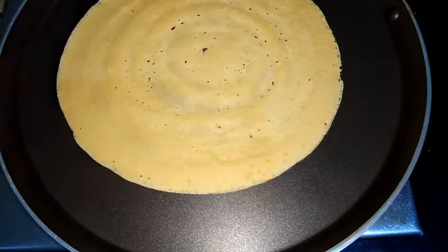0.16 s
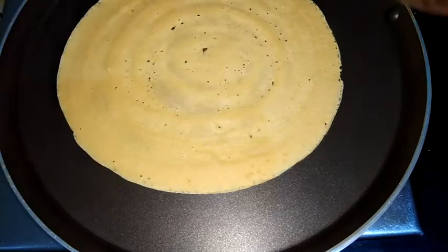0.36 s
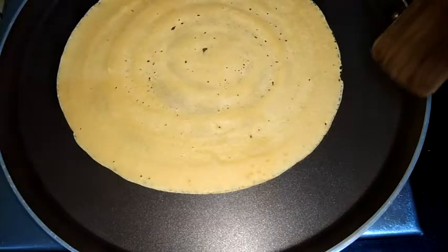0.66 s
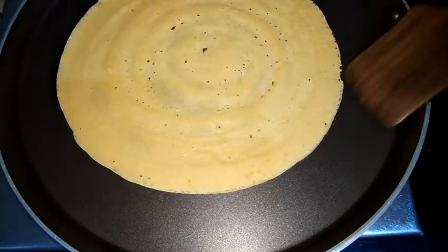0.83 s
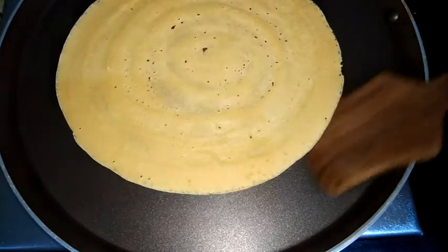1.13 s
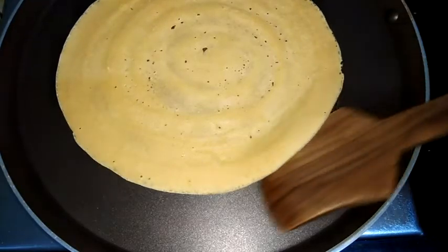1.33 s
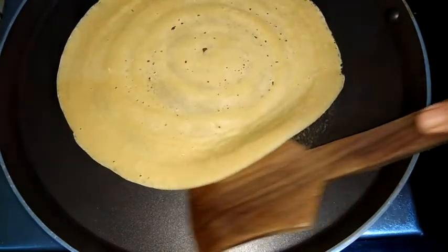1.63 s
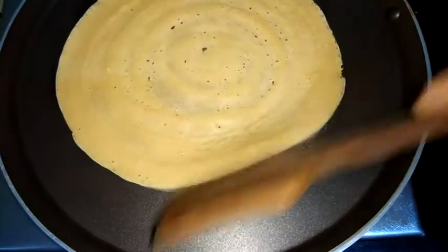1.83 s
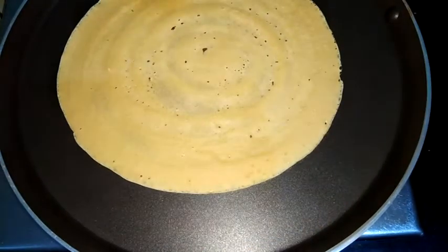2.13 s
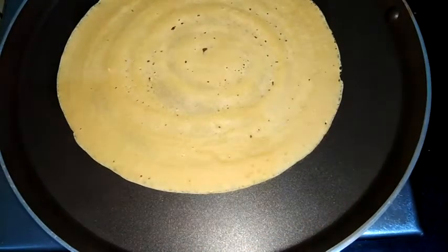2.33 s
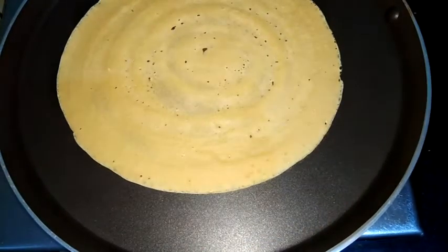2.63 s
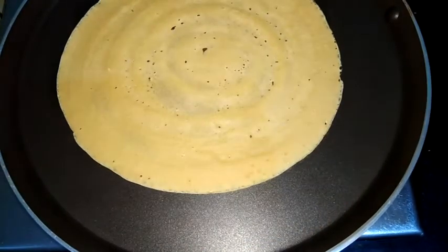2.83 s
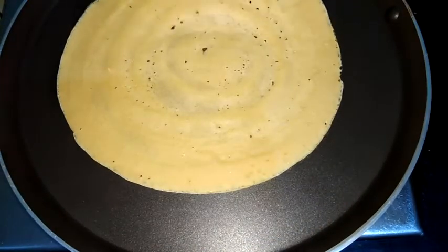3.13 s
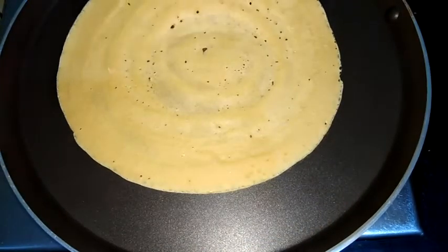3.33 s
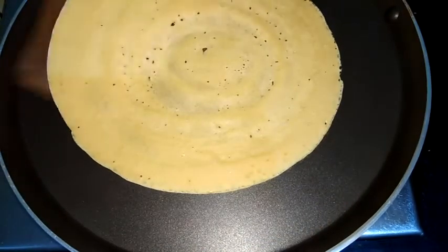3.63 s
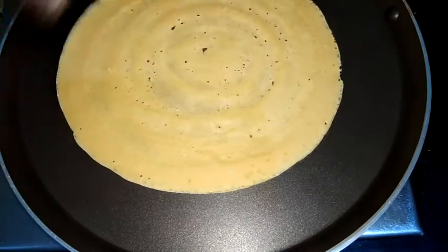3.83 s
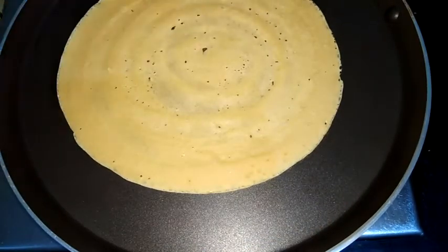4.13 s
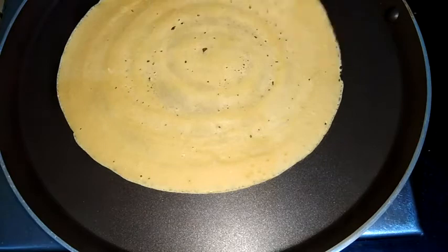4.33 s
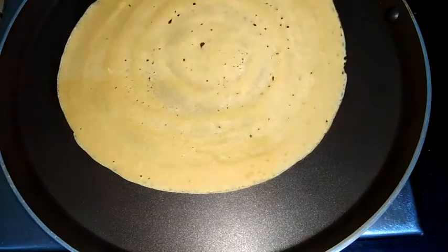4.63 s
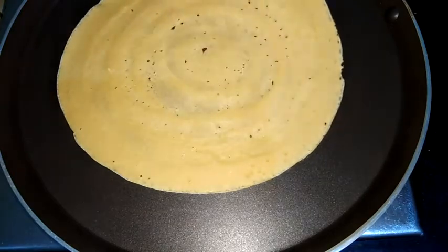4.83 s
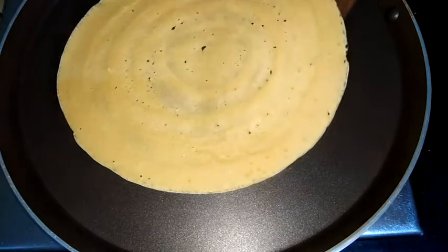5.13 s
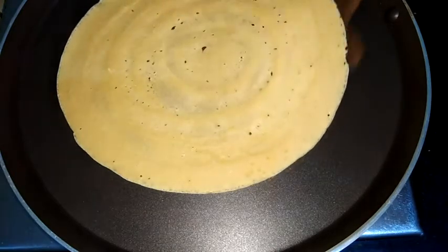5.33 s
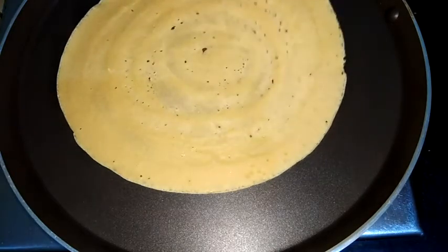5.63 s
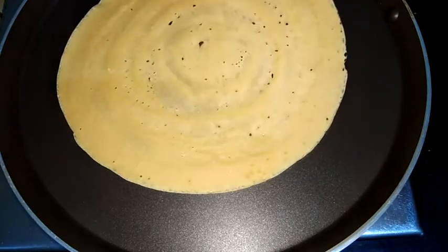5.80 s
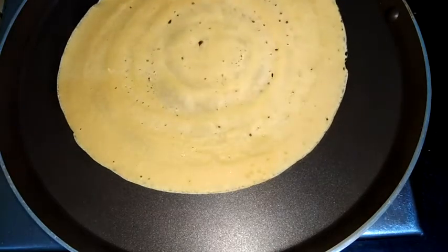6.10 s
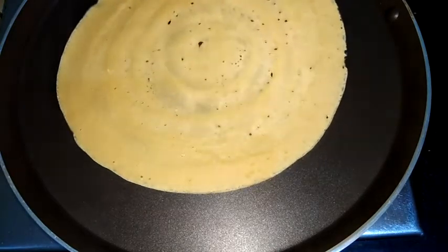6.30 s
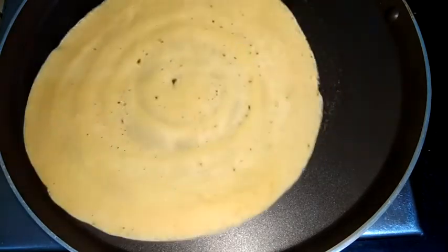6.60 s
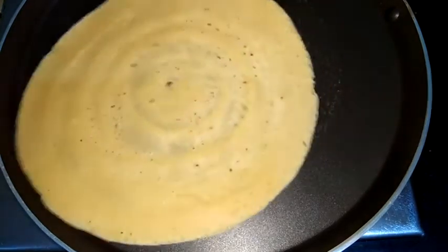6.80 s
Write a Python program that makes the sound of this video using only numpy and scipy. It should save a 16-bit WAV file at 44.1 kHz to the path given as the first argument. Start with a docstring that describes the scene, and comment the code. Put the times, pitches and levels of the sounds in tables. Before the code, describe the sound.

Wood scrapes round a thin crisp bread in a metal pan, with knocks, crust snaps and busy rasping strokes over a faint pulsing cricket.

```python
"""A wooden spatula brushes the rim of a nonstick pan, lands with a boom and glides round a thin, crisp flatbread.
Batter fizzes faintly at first; the crust snaps as it lifts, then the blade skitters over the rim and knocks the pan.
Rasping strokes follow to the end: tiny random slips drive hiss, rasp and the pan's ringing modes.
Throughout, a pulsing narrow noise band gives a faint cricket over a soft kitchen rush.
The left microphone faces the pan, the right one is shaded."""
import sys
import numpy as np
from scipy import signal
from scipy.fft import rfft, irfft, next_fast_len
from scipy.io import wavfile
from scipy.ndimage import uniform_filter1d, map_coordinates

SR = 44100
rng = np.random.default_rng(int(sys.argv[2]) if len(sys.argv) > 2 else 0)


def to_wav(sig):
    """Store sig (one row per channel, or 1-D mono) as 16-bit WAV at the path in sys.argv[1].

    Samples outside -1..1 are clipped; the rate is SR.
    """
    pcm = np.clip(np.atleast_2d(sig), -1, 1) * 32767
    pcm = np.round(pcm).astype(np.int16)
    wavfile.write(sys.argv[1], SR, pcm.T)  # frames by channels


N = 306936

# All levels in the tables are before the mix trims of the layers.
# Pushes and pulls of the blade. Each row: start, fastest moment and end in seconds, rasp in dB,
# hiss and ring in dB relative to the rasp, contact pitch in Hz, its fall in Hz per second.
STROKES = [(1.997, 2.067, 2.17, -54, 2.5, -31, 700, 0), (2.08, 2.12, 2.38, -87, 16, 10, 720, 0),
           (2.606, 2.844, 2.98, -62.5, -11.5, 12.5, 980, 202),
           (2.827, 3.104, 3.22, -50, -3, 11.5, 896, 905), (3.206, 3.314, 3.34, -60.5, -1, 12, 845, 500),
           (3.371, 3.468, 3.58, -49.5, -3.5, 14, 875, 500), (3.45, 3.655, 3.75, -48, -0.5, 7.5, 917, 0),
           (3.767, 3.825, 3.89, -62, 0.5, 7, 916, 0), (4.153, 4.219, 4.34, -44.5, -4.5, 6, 980, 0),
           (4.257, 4.408, 4.57, -44.5, -3, 9, 952, 1002), (4.592, 4.725, 4.85, -47.5, -3, 8.5, 840, 300.5),
           (4.851, 5.02, 5.19, -44.5, -2.5, 9.5, 864, 998), (5.158, 5.411, 5.54, -44, -2, 5, 787, -200),
           (5.525, 5.688, 5.78, -42.5, -7.5, 5, 790, -200), (5.83, 5.856, 5.96, -48, -4, 10.5, 780, 0),
           (5.997, 6.06, 6.19, -45.5, -4.5, 6, 818, -300), (6.19, 6.25, 6.39, -47, -2.5, 8.5, 820, -400),
           (6.365, 6.489, 6.58, -47, -3.5, 6, 860, 606), (6.57, 6.61, 6.7, -49, -4.5, 6, 720, 500),
           (6.732, 6.772, 6.931, -47, -6, 7.5, 730, -200)]
# The first long glide round the edge of the bread, as a curve.
# Each row: time in seconds, crust hiss in dB, wood rasp in dB, pan ring in dB.
GLIDE = [(0.699, -59, -49, -41), (0.80, -53, -56, -46.5), (0.92, -51.5, -47.5, -46),
         (1.05, -52.5, -52, -44.5), (1.29, -54, -54.5, -43), (1.47, -56, -57, -50.5),
         (1.71, -54.5, -57, -55.5), (1.87, -60.5, -63.5, -67), (1.98, -67, -65.5, -64.5)]
# Bare wood dragging on metal. Each row: start in seconds, hold in seconds, boom in dB, fade in dB per second.
DRAGS = [(0.697, 0.23, -46.5, 50), (4.146, 0.02, -42.5, 140), (5.33, 0.02, -53.5, 170)]
# The blade strikes or catches on the pan. Each row: time in seconds, ring in dB,
# boom and clack in dB relative to the ring, clack pitch in Hz.
KNOCKS = [(0.698, -42, -3, 2, 2720), (1.0125, -26, -16, 2, 2450), (1.1, -29, -15, 1, 2500),
          (1.599, -26, -9, -3, 1830), (1.733, -28.5, -11, -4, 1720), (2.4565, -25, -12, -8, 2520),
          (2.465, -29, -10, -18, 1400), (2.482, -33, -12, -14, 1400), (2.498, -33, -8, -12, 1400),
          (3.436, -24, -30, -22, 1400), (4.145, -25, -7, -1, 2510), (4.242, -24, -24, -7, 2600),
          (4.695, -24.5, -34, -12, 1400), (5.342, -32, -10, -2, 2500), (5.750, -27, -24, -1, 3290),
          (5.761, -32, -27, -4, 3290), (5.827, -34, -22, -5, 2020), (6.042, -30, -26, -16, 1800),
          (6.728, -38, -23, -12, 1500)]
# The crust cracks. Each row: time in seconds, tick in dB, crumble in dB.
SNAPS = [(1.585, -22, -47), (1.814, -26, -35), (1.8378, -32, -32), (1.893, -35, -40), (2.007, -29, -35),
         (2.048, -17, -25), (2.075, -24, -33), (2.217, -29, -50), (2.2351, -22, -35), (3.82, -40, -35)]
# Dull bumps of blade and bread. Each row: time in seconds, peak in dB.
BUMPS = [(2.498, -31), (3.746, -45), (3.763, -43), (3.803, -42), (3.895, -48), (3.933, -47)]
# The bread shuffles softly on the pan. Each row: middle in seconds, half length in seconds, level in dB.
SHUFFLES = [(0.92, .09, -55), (1.235, .025, -54), (3.853, .12, -56), (6.12, 0.05, -55)]
# The blade brushes the free rim. Each row: time in seconds, scuff in dB, ring in dB.
BRUSHES = [(0.165, -60, -76), (2.15, -53, -56)]
# The lifted spatula skitters over the rim. Each row: time in seconds, peak in dB.
SKITTERS = [(2.049, -33), (2.061, -42), (2.075, -36), (2.086, -35), (2.099, -39), (2.108, -40)]

# Ringing modes. Each row: pitch in Hz, level in dB, time to fall 60 dB in seconds.
# The pan's wall, damped by the bread; the last mode is the blunt first flex.
WALL = [(400, -4, 0.14), (452, -5, 0.1), (564, -8.5, 0.06), (690, -5, 0.06), (758, 3, 0.08), (803, 0, 0.13),
        (834, 8, 0.12), (916, 5, 0.19), (996, 1, 0.17), (1075, -6, .06), (882, 0, 0.031)]
# The pan's base, same columns.
BASE = [(150.4, -15, 0.069), (203.6, -11, 0.073), (246, -8.5, 0.13), (301, 0, 0.43)]
# The free rim after a light touch, same columns.
PING = [(1295, 0, 1.1), (1435, -4, .25), (2393, -12, .2)]
# The free spatula, same columns.
SPATULA = [(620, -12, 0.06), (1277, -8, .04), (1720, -2, 0.018), (2486, 3, 0.024), (3590, 0, 0.026),
           (4370, -3, 0.018), (5000, 0, 0.016)]
# A soft push that dies at once, same columns.
PUSH = [(190, 0, .03), (360, -4, .016)]
# Short-lived resonances of blade and rim, and the hollows between them.
# Each row: centre in Hz, width in Hz, boost or cut in dB.
RIM = [(1200, 130, -5), (1340, 160, 4), (1620, 200, -7), (1830, 130, 3.5), (2470, 200, 4), (3290, 130, 7.5),
       (3750, 300, -4)]

# Noise colours. Each row: frequency in Hz, level in dB.
# Wood rasping on metal.
RASP = [(60, -24), (130, -28), (300, -12), (560, -14.5), (1100, -29.5), (1400, -2.5), (2300, -1.5),
        (2900, -8), (3800, -7), (4400, -3), (5400, -8.5), (7000, -7), (12000, -14.5)]
# Crust hiss and batter fizz, same columns.
HISS = [(2500, -20), (4800, -7), (5800, -17), (6700, -7), (8500, -4), (10700, 0), (12300, 0), (14000, -2.5),
        (15800, -3.5)]
# Cracking crust, same columns.
SNAP = [(700, -38), (2000, -15.5), (3300, -16.5), (6000, -3), (9000, -2.5), (12500, 6), (16000, -7)]
# Shuffling bread, same columns.
BUMP = [(60, -36), (130, 0.5), (220, 5.5), (400, 0), (600, -15.5), (1500, -39), (5000, -79)]
# The blade's clack and coarse grit, same columns.
CLACK = [(120, -23), (500, -1.5), (900, 4.5), (2600, -3), (3500, -11), (6000, -17.5), (12000, -39)]
# The kitchen's steady rush, same columns.
QUIET = [(25, -15), (110, 11.5), (250, 8.5), (700, 0), (2000, 0.5), (4000, -12), (15000, -5.5)]
# Likeness of the two microphones. Each row: frequency in Hz, correlation from 0 to 1.
ALIKE = [(100, 0.28), (300, 0.54), (800, 0.91), (1400, 0.033), (3100, 0.14), (6800, 0.024)]
# Shading of the right microphone. Each row: frequency in Hz, right minus left in dB.
SHADE = [(100, -5), (380, -6.5), (700, -3), (1000, -1.5), (2400, -3), (4400, -4), (6000, -7), (8100, -14),
         (11000, -23), (15000, -27)]
# The kitchen's echo. Each row: frequency in Hz, time to fall 60 dB in seconds.
KITCHEN = [(150, 0.44), (1000, 0.36), (4000, 0.29), (14000, 0.017)]

TOP_HZ = 15800  # band limit
GLIDE_HZ = 768  # contact pitch of the glide
LIFT_DB_PER_S = 154  # the glide dies away as the blade lifts
OVERRUN_S = 0.031  # each stroke is stretched by this at both ends, so close neighbours overlap
HISS_LAW, RASP_LAW, RING_LAW = 1.22, 1.99, 1.49  # each layer's amplitude grows as this power of blade speed
DETUNE = .007  # depth of the random pitch wander of the rubbed modes
STEP_S = .002  # spacing of the slow blade controls
DRAG_ATTACK_S = 0.011
BRUSH_RISE_S, BRUSH_FALL_S = 0.03, 0.049
CLACK_T60_S, THUD_T60_S = 0.018, .045


def amp(db):
    """Decibels to gain."""
    return 10 ** (np.asarray(db) / 20)


def unit(pair):
    """A stereo pair scaled so that its middle has rms 1."""
    return pair / np.sqrt(np.mean(pair.mean(0) ** 2) + 1e-20)


def along(points, hz):
    """(Hz, value) points read on a log axis."""
    f, v = np.transpose(points)
    return np.interp(np.log(hz + 1), np.log(f + 1), v)


def wobble(rate):
    """A smooth random curve, rate knots a second."""
    knots = rng.standard_normal(int(N * rate / SR) + 4)
    return map_coordinates(knots, [np.arange(N) * rate / SR])


def to_samples(control):
    """A slow control, one value a step, drawn out to one value a sample."""
    return np.interp(np.arange(N) / SR, np.arange(len(control)) * STEP_S, control)


def filtered(x, response):
    """x times a response of frequency."""
    m = next_fast_len(N + SR // 2)
    return irfft(rfft(x, m) * response(np.fft.rfftfreq(m, 1 / SR)), m)[..., :N]


def resonance(f, hz, width):
    """Causal response of one mode."""
    return 1j * f * width / (hz * hz - f * f + 1j * f * width)


def blade_colour(f, spectrum):
    """Broad response of wood on metal with the rim's resonances on top."""
    peaks = np.prod([1 + (amp(db) - 1) * resonance(f, hz, width) for hz, width, db in RIM], axis=0)
    return amp(along(spectrum, f)) * peaks


def heard(pair, response):
    """Two unrelated signals, coloured and blended into the open left and shaded right microphone."""
    turn = lambda f: np.arccos(np.clip(along(ALIKE, f), -1, 1)) / 2
    mid, side = filtered(pair, lambda f: response(f) * np.array([np.cos(turn(f)), np.sin(turn(f))]))
    return filtered(np.array([mid + side, mid - side]), lambda f: amp([0 * f, along(SHADE, f)]))


def slips(rate, spread_db, smooth):
    """Friction: tiny slips of uneven size at random moments, over a share of even rubbing."""
    count = int(rate * N / SR)
    sizes = amp(spread_db * np.clip(rng.standard_normal(count), -2, 2))
    energy = np.bincount(rng.integers(0, N, count), sizes ** 2, N)
    energy = np.abs(uniform_filter1d(energy, size=12))
    return np.sqrt(energy / energy.mean() + smooth ** 2) * rng.standard_normal((2, N))


def shifting(pair, patchy_db):
    """Random patches of time and pitch rise and sink, so the colour keeps shifting."""
    z = signal.stft(pair, nperseg=512)[2]
    field = uniform_filter1d(rng.standard_normal(z.shape[1:]), size=3, axis=0)
    field = uniform_filter1d(field, size=24, axis=1)
    patches = amp(patchy_db * np.clip(field / field.std(), -2, 2))
    return signal.istft(z * patches, nperseg=512)[1][:, :N]


def bursts(rows, t60):
    """A dying puff of noise for each (s, dB) row."""
    t = np.arange(SR // 4) / SR
    envelope = np.zeros(N + SR)
    for s, db in rows:
        envelope[round(s * SR):][:len(t)] += amp(db - 60 * t / t60)
    return envelope[:N] * rng.standard_normal((2, N))


def struck(rows, modes, rise, right_db):
    """Modes start together after each (s, dB) blow, at new strengths, and die each at its own rate."""
    t = np.arange(SR) / SR
    out = np.zeros(N + SR)
    for s, db in rows:
        chance = rng.standard_normal(len(modes))
        ring = 0
        for (hz, level, t60), a in zip(modes, chance):
            ring = ring + amp(level + 2 * a - 60 * t / t60) * np.sin(2 * np.pi * hz * t)
        ring *= 1 - np.exp(-t / rise)
        out[round(s * SR):][:len(t)] += amp(db) * ring / np.abs(ring).max()
    return out[:N] * amp([[0], [right_db]])


def rubbed(modes, drive, wander_db, weight=lambda hz: 1):
    """Modes kept ringing by friction, each wandering at random in level, all wavering slightly in pitch."""
    m = next_fast_len(N + SR // 2)
    f, push = np.fft.rfftfreq(m, 1 / SR), rfft(drive, m)
    out = 0
    for hz, db, t60 in modes:
        width = np.log(1000) / (np.pi * t60)
        ring = irfft(push * resonance(f, hz, width) * resonance(f, hz, hz / 2), m)[:, :N]
        # lightly damped modes build up most
        out = out + ring / width * amp(db + wander_db * wobble(6)) * weight(hz)
    clock = np.arange(N) + np.cumsum(DETUNE * wobble(14))
    wavering = np.array([np.interp(clock, np.arange(N), side) for side in out])
    out = heard(wavering, np.ones_like)
    # the stroke's force, not chance, sets the overall strength
    power = np.abs(uniform_filter1d(out.mean(0) ** 2, size=1400))
    return unit(out / np.sqrt(power + 1e-20))


def room_tone():
    """The faint steady rush of the kitchen: coloured noise."""
    return amp(-77.5) * unit(heard(rng.standard_normal((2, N)), lambda f: amp(along(QUIET, f))))


def cricket(centre_hz=5790, width_hz=600, depth_db=5.0, db=-63):
    """Even chirps of a distant cricket, smeared by the walls into a pulsing narrow band."""
    phase = 2 * np.pi * (np.arange(N) / SR - .075) / .1412  # first peak and period in seconds
    band = lambda f: 1 / (1 + (2 * (f - centre_hz) / width_hz) ** 6)
    song = heard(rng.standard_normal((2, N)), band)
    song = song / np.sqrt(np.abs(uniform_filter1d(song ** 2, size=300)))  # level out the noise
    return amp(db) * unit(song * amp(depth_db * np.cos(phase)) * amp([[0], [-9]]))


def kitchen(x):
    """Hard walls answer with a decaying noise tail, the treble dying first."""
    hz, t, z = signal.stft(rng.standard_normal((2, SR // 2)), SR, nperseg=256)
    decay = amp(-60 * t / along(KITCHEN, hz)[:, None])
    tail = signal.istft(z * decay, SR, nperseg=256)[1]
    tail = np.pad(tail / np.linalg.norm(tail[0]), ((0, 0), (SR // 200, 0)))  # 5 ms before the answer
    return signal.fftconvolve(x, tail, axes=1)[:, :N]


def sizzle(db=-76, waver_db=4, until_s=2.5):
    """The batter fizzes faintly and waveringly on the hot metal until its edge has been lifted."""
    noise = shifting(rng.standard_normal((2, N)), patchy_db=5)
    fizz = unit(heard(noise, lambda f: amp(along(HISS, f))))
    stuck = np.clip((until_s - np.arange(N) / SR) / .1, 0, 1)
    return amp(db + waver_db * wobble(30)) * fizz * stuck


def rim_brushes():
    """The blade brushes the rim on its way in and out: a soft scuff and a faint ring of the free rim."""
    t = np.arange(N) / SR
    brush = 0
    for s, db, ring in BRUSHES:
        rise = (np.minimum(t - s, 0) / BRUSH_RISE_S) ** 2
        fall = np.maximum(t - s, 0) / BRUSH_FALL_S
        brush = brush + amp(db) * np.exp(-rise - fall)
    colour = lambda f: resonance(f, 1230, 2300) ** 2 + amp(11.5) * resonance(f, 1325, 67)
    scuff = unit(heard(rng.standard_normal((2, N)), colour))
    touches = [(s, ring) for s, db, ring in BRUSHES]
    return brush * scuff + struck(touches, PING, rise=0.0014, right_db=-33.0)


def bumps(right_db=12):
    """Soft contacts give low, quickly dying pushes amid a loose shuffle, strongest on the right."""
    t = np.arange(N) / SR
    swell = sum(amp(db) * np.exp(-((t - s) / half) ** 4) for s, half, db in SHUFFLES)
    rub = slips(rate=150, spread_db=3, smooth=.4)
    shuffle = unit(heard(rub, lambda f: amp(along(BUMP, f))) * amp([[0], [right_db]]))
    return struck(BUMPS, PUSH, rise=.0006, right_db=3) + amp(-3) * swell * shuffle


def skitter():
    """Light taps click and ring the spatula itself as it leaves the pan."""
    clicks = heard(bursts(SKITTERS, t60=.006), lambda f: resonance(f, 3800, 4500))
    return amp(1.5) * struck(SKITTERS, SPATULA, rise=.0003, right_db=-3) + amp(0.5) * clicks


def snaps():
    """Crisp crust breaks with a sharp tick and a brief crumble of finer cracks."""
    ticks = bursts([(s, tick) for s, tick, crumble in SNAPS], t60=.002)
    crumbs = bursts([(s, crumble) for s, tick, crumble in SNAPS], t60=.035)
    crumbs = crumbs * amp(4 * wobble(600) - 3)
    return amp(0.5) * heard(ticks + crumbs, lambda f: amp(along(SNAP, f)))


def knocks():
    """Blows clack and ring the wall; the heavy base thuds and swells more slowly, damped by the resting blade."""
    wall = struck([(s, db) for s, db, boom, clack, hz in KNOCKS], WALL, rise=0.0006, right_db=-5)
    damped = [(hz, db, min(t60, .24)) for hz, db, t60 in BASE]
    pushes = [(s, db + boom) for s, db, boom, clack, hz in KNOCKS]
    base = struck(pushes, damped, rise=0.006, right_db=-9)
    thud = heard(bursts(pushes, t60=THUD_T60_S), lambda f: resonance(f, 380, 700) ** 2)
    tip = 0
    for s, db, boom, clack, hz in KNOCKS:
        tip = tip + struck([(s, db + clack)], [(hz, 0, CLACK_T60_S)], rise=0.000067, right_db=-15)
    hits = [(s, db + clack) for s, db, boom, clack, hz in KNOCKS]
    crack = bursts(hits, t60=0.0064) + amp(-7.5) * bursts(hits, t60=0.13)
    crack = heard(crack, lambda f: blade_colour(f, CLACK))
    return amp(-5) * wall + base + amp(8.5) * thud + amp(-2) * tip + amp(2.5) * crack


def dragging():
    """The bare edge chatters on the metal in coarse grains and the pan's base booms: attack, hold, fade."""
    t = np.arange(N) / SR
    force = 0
    for s, hold, db, fade in DRAGS:
        attack = np.clip((t - s) / DRAG_ATTACK_S, 0, 1)
        force = force + attack * amp(db - fade * np.maximum(t - s - DRAG_ATTACK_S - hold, 0))
    chatter = slips(rate=110, spread_db=3.5, smooth=.5)
    grit = unit(heard(chatter, lambda f: blade_colour(f, CLACK)))
    boom = rubbed(BASE, slips(rate=110, spread_db=2, smooth=1.0), wander_db=3) * amp(2.5 * wobble(35))
    return (amp([[0], [-2]]) * boom + amp(-11) * grit) * force


def blade_motion():
    """Each stroke speeds up and slows in one arc; speed sets hiss, rasp and ring gains. Also gives contact Hz."""
    t = np.arange(0, N / SR, STEP_S)
    start, fastest, end, rasp_db, hiss_db, ring_db, contact_hz, fall = np.transpose(STROKES)[:, :, None]
    before = (fastest - t) / np.abs(fastest - start + OVERRUN_S)
    after = (t - fastest) / np.abs(end - fastest + OVERRUN_S)
    to_rest = np.maximum(before, after)  # 0 when fastest, 1 at rest
    speed = np.abs(np.cos(np.pi / 2 * np.minimum(to_rest, 1)))
    strokes = [amp(rasp_db + hiss_db) * speed ** HISS_LAW,
               amp(rasp_db) * speed ** RASP_LAW,
               amp(rasp_db + ring_db) * speed ** RING_LAW]
    s, *glide_db = np.transpose(GLIDE)
    touching = (t >= s[0]) * amp(-LIFT_DB_PER_S * np.maximum(t - s[-1], 0))
    glide = [touching * amp(np.interp(t, s, db)) for db in glide_db]
    hiss, rasp, ring = [np.sqrt(g ** 2 + (k ** 2).sum(0)) for g, k in zip(glide, strokes)]
    # the contact pitch leans to whichever stroke rings loudest
    share = strokes[2] ** 2 / (ring ** 2 + 1e-20)
    centre = GLIDE_HZ + (share * (contact_hz - fall * (t - fastest) - GLIDE_HZ)).sum(0)
    return [to_samples(control) for control in (hiss, rasp, ring, centre)]


def scraping():
    """Crust hiss, wood rasp and ringing wall share one judder; coarse catches are added beside them."""
    hiss_gain, rasp_gain, ring_gain, centre = blade_motion()
    judder = .7 * wobble(28) + .6 * wobble(80) + .4 * wobble(220)
    hiss = shifting(slips(rate=3000, spread_db=4.5, smooth=1.0), patchy_db=4.5)
    hiss = unit(heard(hiss, lambda f: amp(along(HISS, f))) * amp(1.4 * judder))
    rasp = shifting(slips(rate=1300, spread_db=4, smooth=.5), patchy_db=3.5)
    rasp = unit(heard(rasp, lambda f: blade_colour(f, RASP)) * amp(1.0 * judder))
    catches = slips(rate=170, spread_db=3, smooth=.15)
    grit = unit(heard(shifting(catches, patchy_db=3), lambda f: blade_colour(f, CLACK)))
    rasp = rasp + amp(-6.5) * grit
    # wall modes near the contact pitch ring loudest
    nearness = lambda hz: .3 + np.exp(-((hz - centre) / 75) ** 2)
    drive = catches + slips(rate=410, spread_db=1.5, smooth=0.48)
    wall = rubbed(WALL, drive, wander_db=6.0, weight=nearness) * amp(0.9 * judder)
    return amp(2.0) * hiss * hiss_gain + amp(-2.18) * rasp * rasp_gain + amp(-4.5) * wall * ring_gain


def scene():
    """Pan and spatula close by, the kitchen around them."""
    contact = knocks() + skitter() + bumps() + snaps() + rim_brushes() + scraping() + dragging() + sizzle()
    return contact + amp(-12) * kitchen(contact) + cricket() + room_tone()


def record(dry, low_hz=80):
    """The small microphones lose the deep bass, and nothing is kept above the band limit."""
    thin = signal.sosfilt(signal.butter(2, low_hz, "highpass", fs=SR, output="sos"), dry)
    return filtered(thin, lambda hz: hz < TOP_HZ)


dry = scene()
out = record(dry)
to_wav(out)
```